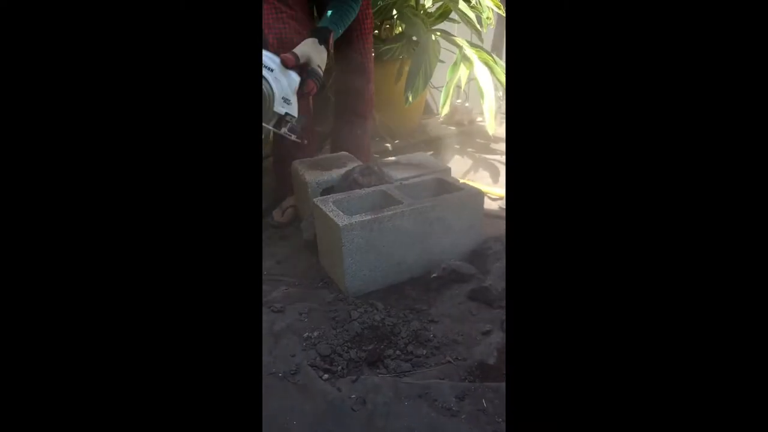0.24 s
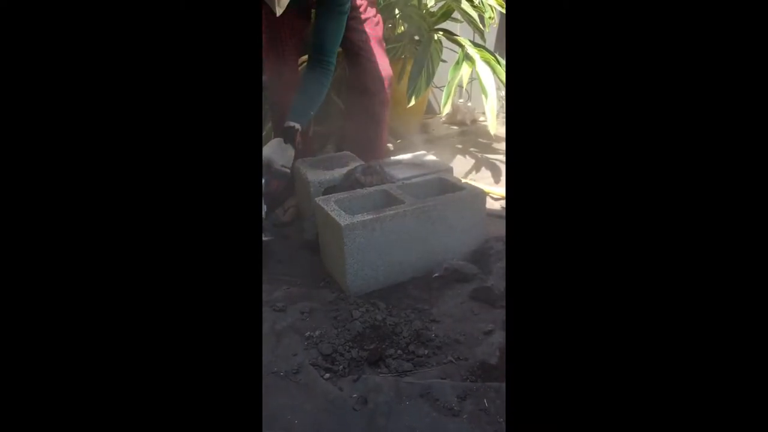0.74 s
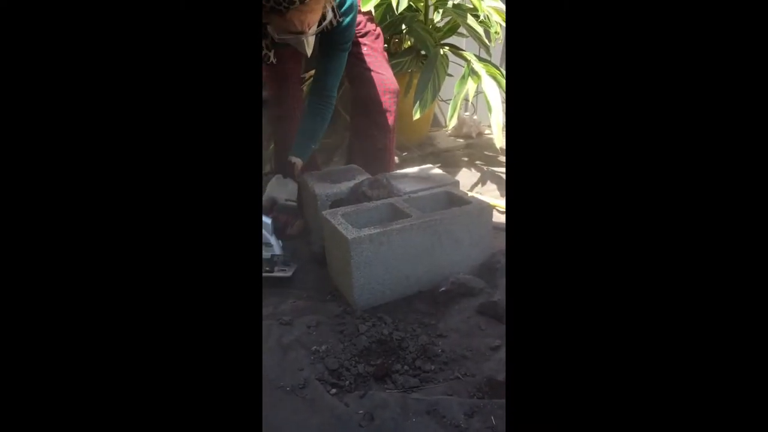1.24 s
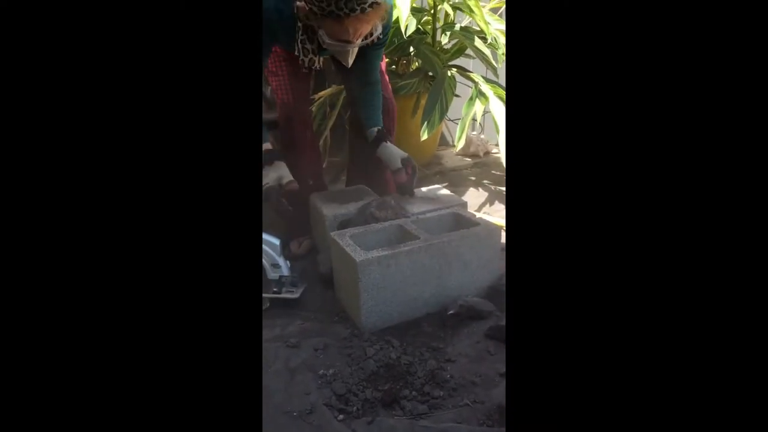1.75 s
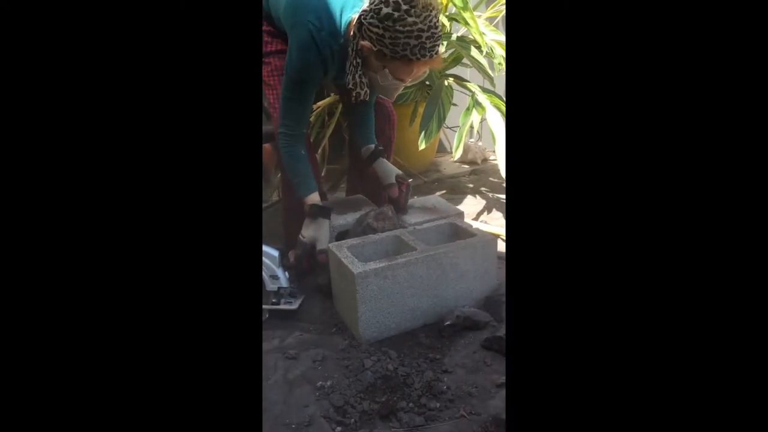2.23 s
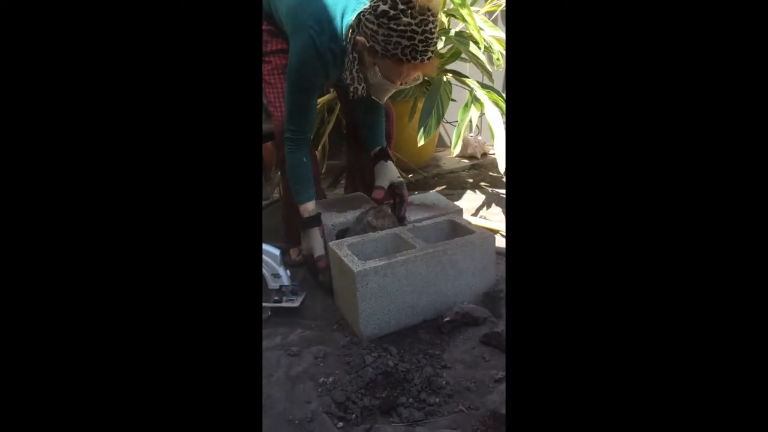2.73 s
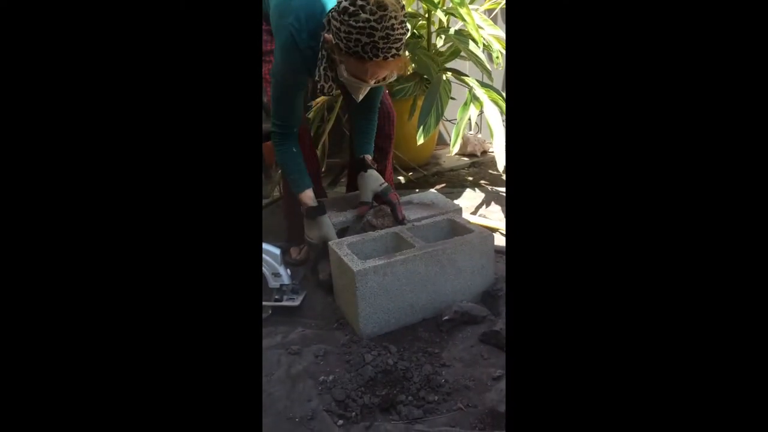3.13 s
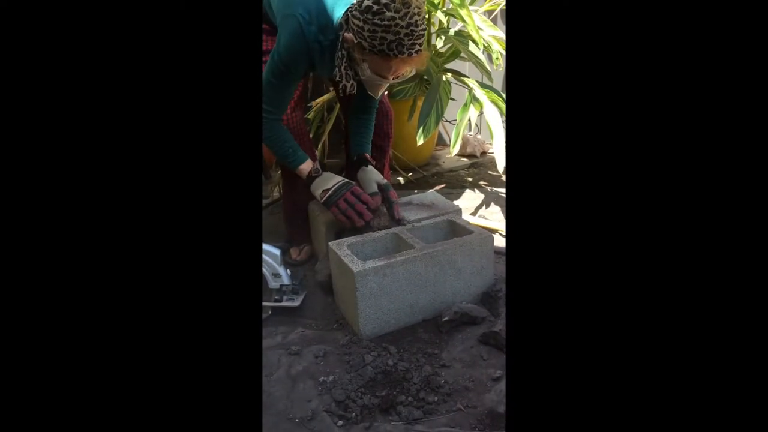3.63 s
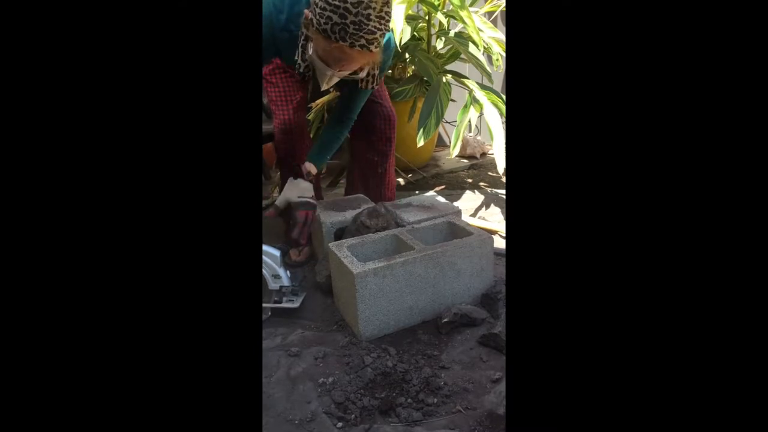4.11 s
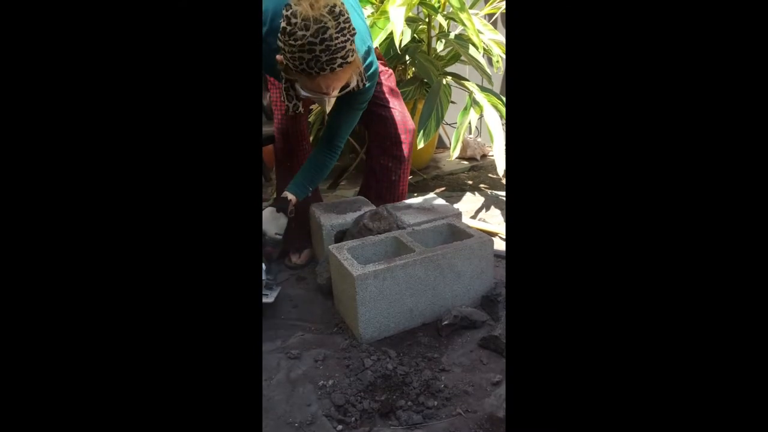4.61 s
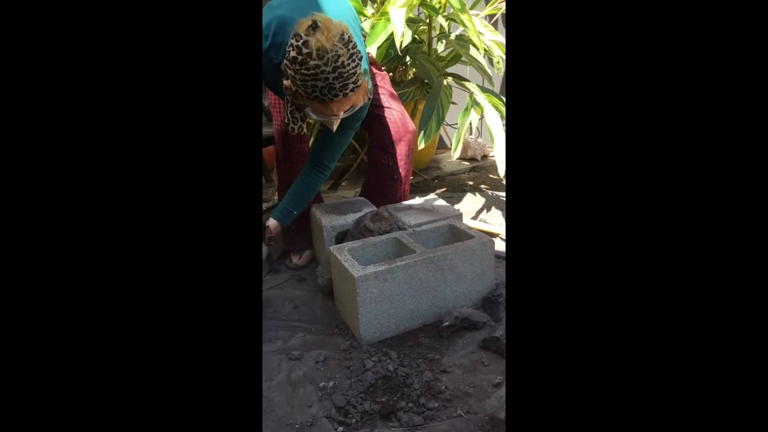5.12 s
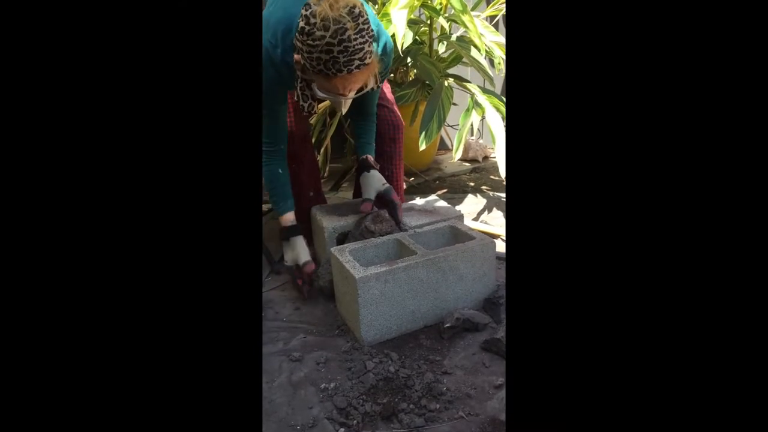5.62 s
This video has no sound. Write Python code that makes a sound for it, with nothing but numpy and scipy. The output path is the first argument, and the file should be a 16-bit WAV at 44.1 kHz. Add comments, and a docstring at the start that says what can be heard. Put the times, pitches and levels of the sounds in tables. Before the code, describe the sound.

Falling motor whine and rushing air of a coasting saw, rhythmic metallic brushing turning to rapid clatter, then silence with gritty stone knocks outdoors.

```python
"""A circular saw, just switched off, is swung aside and set on the ground in a yard, where it coasts to a stop.
Fan and slot tones glide down with one braked speed, over filtered noise for eddies and rushing air.
The blade brushes the guard once a turn, then clatters and drags: tiny random contacts ringing steel modes.
A stone knocks on a concrete block nearby, with ticks, a gritty scrape and rustling cloth.
Contacts get dull yard echoes; a faint noise bed lies behind everything, all at one mono microphone."""
import sys
import numpy as np
from scipy import signal
from scipy.fft import rfft, irfft, next_fast_len
from scipy.io import wavfile

SR = 44100
rng = np.random.default_rng(int(sys.argv[2]) if len(sys.argv) > 2 else 0)


def output_pcm(signal):
    """Save a mono or channel-first signal as 16-bit PCM at the path in sys.argv[1].

    Samples are clipped to [-1, 1] before scaling.
    """
    pcm = np.clip(np.atleast_2d(signal).T, -1, 1) * 32767
    wavfile.write(sys.argv[1], SR, np.round(pcm).astype(np.int16))


N = 258426
TIME = np.arange(N) / SR
# padded length for spectral filters, and its frequency axis
SIZE = 2 * next_fast_len(N // 2 + SR // 4)
HZ = np.maximum(np.arange(SIZE // 2 + 1) * SR / SIZE, 1)

# speed is counted in fan vanes passing per second
START_SPEED, VANES_PER_BLADE_TURN = 3381.8, 61.4
# share of a turn at which the blade meets the guard
RUB_ANGLE = .35
# the blade runs loose from this time on
LOOSE_S = 2.915
# the blade comes to rest, and all its noise dies
REST_S, REST_DB_PER_S = 5.08, 167
# just before rest the contacts turn dull
DULL_S, DULL_DB_PER_S = 4.75, 30
# the motor's tones and eddies die out at low speed
MOTOR_FADE_S, MOTOR_FADE_DB_PER_S = 3.75, 28


def from_db(db):
    """Decibels to gain."""
    return 10 ** (np.asarray(db) / 20)


def rms_one(x):
    """Scale to unit power."""
    return x / np.sqrt(np.mean(x ** 2) + 1e-20)


def in_time(rows):
    """Each column of a curve at every sample."""
    s, *columns = np.transpose(rows)
    return [np.interp(TIME, s, c) for c in columns]


def fading(start_s, db_per_s):
    """Level in dB that holds, then sinks steadily."""
    return -db_per_s * np.maximum(TIME - start_s, 0)


def swell(centre_s, half_s):
    """Bell-shaped rise and fall in time."""
    return np.exp(-.5 * ((TIME - centre_s) / half_s) ** 2)


def turns_from(turns, angle):
    """Signed share of a turn away from an angle, -0.5 to 0.5."""
    return (turns - angle + .5) % 1 - .5


def passed(x, hz, kind, order=2):
    """Butterworth filter."""
    sos = signal.butter(order, np.clip(hz, 5, .45 * SR), kind, fs=SR, output="sos")
    return signal.sosfilt(sos, x + 1e-18)


def drift(rate):
    """Random wander of spread 1, with so many new values per second."""
    return rms_one(np.interp(TIME * rate, np.arange(4096), rng.standard_normal(4096)))


def colour(x, spectrum, resonances=()):
    """Causal filter with a smooth spectrum, lifted at each resonance."""
    hz, db = np.transpose(spectrum)
    curve = np.interp(np.log(HZ), np.log(hz), db)
    for centre, width, lift in resonances:
        curve = curve + lift / (1 + (2 * (HZ - centre) / width) ** 2)
    # folding the cepstrum gives minimum phase: nothing sounds before its cause
    cepstrum = irfft(np.log(from_db(curve)))[:SIZE // 2]
    cepstrum[1:] *= 2
    return irfft(rfft(x, SIZE) * np.exp(rfft(cepstrum, SIZE)))[:N]


def shaped(x, spectrum):
    """Colour a sound so that white noise keeps its power."""
    hz, db = np.transpose(spectrum)
    gain = from_db(np.interp(np.log(HZ), np.log(hz), db))
    return colour(x, spectrum) / np.sqrt(np.mean(gain ** 2))


def ring(x, modes):
    """Parallel resonances of alternating sign, scaled so that white noise about keeps its power."""
    out, power = 0, 0
    for k, (hz, width, db) in enumerate(modes):
        r = np.exp(-np.pi * width / SR)
        top = (1 - r * r) / 2
        poles = [1, -2 * r * np.cos(2 * np.pi * hz / SR), r * r]
        out = out + (-1) ** k * from_db(db) * signal.lfilter([top, 0, -top], poles, x + 1e-18)
        power += top * from_db(db) ** 2
    return out / np.sqrt(power)


def grains(per_s, spread_db):
    """Dense tiny contacts of uneven size; rms 1."""
    sizes = from_db(spread_db * np.minimum(rng.exponential(1, N), 4)) * rng.choice([-1, 1], N)
    return rms_one(sizes * (rng.random(N) < per_s / SR))


def blows(rows, decay_s):
    """Force envelope that jumps at each (time [s], level [dB]) and dies away."""
    hits = np.zeros(N)
    for s, db in rows:
        hits[int(s * SR)] += from_db(db)
    return signal.lfilter([1], [1, -np.exp(-1 / (decay_s * SR))], hits + 1e-18)


def yard_background():
    """The open yard's faint, mostly low noise, wavering slightly in level."""
    # outdoor noise spectrum: (frequency [Hz], relative level per Hz [dB])
    yard_spectrum = [(25, -51), (45, -9), (70, -1.5), (125, 1), (200, -5.5), (350, -17), (700, -17.5),
                     (1200, -15.5), (2000, -32), (5000, -41), (15800, -43.5)]
    noise = rms_one(colour(rng.standard_normal(N), yard_spectrum))
    return from_db(-53 + 0.35 * drift(4.8)) * noise


def yard_echoes(x, t60=0.16, wall_cut_hz=6000):
    """The direct sound plus a few dull echoes and a short scattered tail."""
    # nearby ground and walls: (delay [s], level [dB])
    echo_rows = [(.0175, -26), (.027, -25), (.034, -24)]
    age = np.arange(SR // 2) / SR
    tail = rng.standard_normal(len(age)) * from_db(-60 * age / t60) * (age > .006)
    response = from_db(-11.0) * tail / np.sqrt(np.sum(tail ** 2))
    for delay, db in echo_rows:
        response[int(delay * SR)] += from_db(db)
    return x + passed(signal.fftconvolve(x, response)[:N], wall_cut_hz, "low")


def rustle(low_hz=606, high_hz=1500):
    """Gloves and clothes shift: soft, dull swells of tiny fibre contacts."""
    # cloth movements: (centre time [s], half length [s], level [dB])
    rustle_rows = [(5.22, 0.038, -52), (5.342, 0.026, -67), (5.435, 0.022, -62), (5.506, 0.0096, -61),
                   (5.573, 0.014, -55.5)]
    swells = sum(from_db(db) * swell(s, half) for s, half, db in rustle_rows)
    cloth = passed(grains(per_s=1500, spread_db=3.0), [low_hz, high_hz], "band")
    return swells * rms_one(cloth)


def scrapes(attack_db_per_s=2498, release_db_per_s=598):
    """Sand grains crushed as the stone slides; each scrape starts fast, holds and dies away."""
    # stone slid over the block: (start time [s], length [s], level [dB], treble lift [dB])
    scrape_rows = [(4.345, .008, -47, 3), (4.477, .008, -45, -5), (4.54, .03, -60, 0),
                   (4.615, .02, -54.5, 0), (4.7, .03, -57, 0), (4.79, .02, -54, -3),
                   (4.853, 0.058, -55.5, 1.5), (4.93, .04, -67, 0), (5.114, .005, -44, 3),
                   (5.13, 0.066, -62, 2), (5.203, 0.0078, -48, 0), (5.415, .012, -66, 3),
                   (5.447, .006, -71, 3), (5.547, 0.032, -76, 0), (5.681, .003, -48.5, 1),
                   (5.723, .02, -48.5, 4), (5.741, 0.0076, -45, 7.5), (5.776, 0.016, -43, -3),
                   (5.803, .08, -51, -9)]
    # crushed grit: (frequency [Hz], relative level per Hz [dB])
    grit_spectrum = [(180, -44), (300, -10), (360, -10.5), (1550, -7), (1920, -6.5), (2120, -3.5),
                     (3270, -3.5), (4790, -4), (8700, -9.5), (15800, -16.5)]
    levels_db = []
    for s, length, db, _ in scrape_rows:
        attack_db = -attack_db_per_s * np.maximum(s - TIME, 0)
        levels_db.append(db + attack_db + fading(s + length, release_db_per_s))
    levels_db = np.array(levels_db)
    bright_db = levels_db + np.array(scrape_rows)[:, 3:]
    sand = shaped(grains(per_s=9200, spread_db=6.0), grit_spectrum)
    treble = passed(sand, 6500, "high", order=1)
    # the loudest scrape of the moment sets the level
    body = from_db(levels_db.max(axis=0)) * (sand - treble)
    return body + from_db(bright_db.max(axis=0)) * treble


def grit_ticks():
    """Grit snaps under the stone: brief bright bursts of random force."""
    # grit snapping: (time [s], relative level [dB])
    tick_rows = [(5.505, -50), (5.5495, -25.5), (5.572, -30), (5.7745, -42), (5.7895, -31), (5.801, -37),
                 (5.846, -53)]
    snaps = from_db(-5.5) * blows(tick_rows, decay_s=0.0012) * rng.choice([-1, 1], N)
    return passed(snaps, 7700, "high", order=1)


def stone_and_bumps(contact_s=0.0043, thump_hz=122, thump_width_hz=40):
    """Each knock is a short crunch that rings the stone and thumps the ground; soft bumps only thump."""
    # stone on block: (time [s], relative level [dB], contact cut-off [Hz], relative low thump level [dB])
    knock_rows = [(5.11, -6, 1560, -35), (5.1137, -7.5, 7100, -38), (5.117, -13, 4000, -44),
                  (5.205, -34, 7000, -41), (5.418, -41.5, 4930, -62), (5.426, -45, 5000, -61),
                  (5.68, -29.5, 9000, -55), (5.681, -60, 7000, -56), (5.848, -45, 8900, -59)]
    # stone modes: (frequency [Hz], width [Hz], relative level [dB])
    stone_modes = [(430, 220, -21), (675, 91, -13), (1010, 120, -11.5), (1210, 47, -7), (1484, 67, -1),
                   (1760, 250, -6.5), (2030, 200, -4), (2500, 240, -7), (2980, 210, -12.5),
                   (3590, 180, -8.5), (4470, 230, -15), (5600, 410, -36), (6700, 200, -19),
                   (8660, 220, -11)]
    # soft bumps on the ground: (time [s], relative level [dB])
    bump_rows = [(1.209, -32), (1.262, -35), (4.354, -37.5), (5.207, -33.5), (5.319, -45), (5.37, -47.5)]
    force, thump = np.zeros(N), np.zeros(N)
    age = np.arange(SR // 40) / SR
    crunches = rng.choice([-1, 1], (len(knock_rows), len(age))) * np.exp(-age / contact_s)
    for (s, db, cut_hz, thump_db), crunch in zip(knock_rows, crunches):
        at = int(s * SR)
        blow = 0.5 * crunch + 3.9 * (age == 0)
        force[at:at + len(age)] += from_db(db) * passed(blow, cut_hz, "low", order=4)[:N - at]
        thump[at] = from_db(thump_db)
    for s, db in bump_rows:
        thump[int(s * SR)] = from_db(db)
    low = ring(thump, [(thump_hz, thump_width_hz, 0), (270, 110, -9)])
    crunching = from_db(-8.0) * passed(force, 770, "high", order=1)
    return from_db(-1.0) * ring(force, stone_modes) + crunching + from_db(23.0) * low


def coasting():
    """Speed at every sample, braked step by step by dry friction, grease and air drag."""
    # speed lost per second: constant, per speed, per speed squared
    dry_friction, grease_drag, air_drag = 360.8, .1018, 3.834e-5
    step_s = .001
    speeds = [START_SPEED]
    steps = np.arange(0, N / SR, step_s)
    for _ in steps[1:]:
        v = speeds[-1]
        braking = dry_friction + grease_drag * v + air_drag * v * v
        speeds.append(max(v - step_s * braking, 1))
    return np.interp(TIME, steps, speeds)


def air(speed_db, turns):
    """Housing turbulence sinks with speed, gently chopped by the turning blade and mirrored in the ground."""
    # rushing air: (frequency [Hz], relative level per Hz [dB])
    air_spectrum = [(88, -36), (150, -15.5), (532, -25), (634, -9), (901, -1.5), (1440, 2.5), (1650, -1.5),
                    (1850, -3), (2080, -5.5), (2480, -2), (3460, -13), (4370, -16), (4810, -14),
                    (8640, -20), (15800, -27.5)]
    # housing resonances: (frequency [Hz], width [Hz], lift [dB])
    housing_modes = [(461, 260, 15), (677, 100, 8), (818, 140, 7), (1104, 280, 5.5), (1400, 41, 6),
                     (1845, 290, 14.5), (2140, 120, 9), (2500, 450, 8.5), (3120, 52, 6.5), (4260, 106, 9.5),
                     (5730, 560, 2.5), (9470, 462, 1)]
    # cooling air: (low edge [Hz], high edge [Hz], base level at full speed [dB], loss per dB of speed lost [dB])
    band_rows = [(173, 590, -37, 1.38), (526, 1190, -32.5, 1.05), (1072, 2750, -27, 1.69),
                 (2996, 21800, -25, 2)]
    # the vents turn as the saw is swung aside, level changes:
    # (time [s], housing drone [dB], duct roar [dB], vent rush [dB], hiss [dB])
    swing_rows = [(0, -1, -1, -1, -1.5), (0.249, 1, 0, -5, -1), (.45, 2, 0.5, 0.5, 1.5),
                  (.65, 2.5, -3, 6.5, 2.5), (.8, 4, -13, 4, 2), (1.02, 5.5, -3, 5.5, 1),
                  (1.3, 6.5, -2, 2.5, 0), (2.0, 4.5, 0.5, 0, -1.5), (3.0, 1, 3.5, 0.5, -6.5)]
    out = 0
    for (low, high, db, follows), swing_db in zip(band_rows, in_time(swing_rows)):
        noise = colour(rng.standard_normal(N), air_spectrum, housing_modes)
        band = rms_one(passed(noise, [low, high], "band", order=4))
        out = out + band * from_db(db + follows * speed_db + swing_db + 0.86 * drift(40))
    # the ground reflection's delay [s] shortens as the saw is lowered
    delay = np.interp(TIME, [0, 0.94], [0.001418, 0.000542])
    out = out + 0.27 * np.interp(TIME - delay, TIME, out)
    chop_db = 0.13 * np.cos(2 * np.pi * (turns - RUB_ANGLE))
    return out * from_db(chop_db + fading(REST_S, REST_DB_PER_S))


def eddies(speed_db, vanes):
    """Shed by the fan: a narrow rush falling with its tone; the small housing radiates little of its bass."""
    pitch_ratio, width_hz = .68, 122  # pitch as share of the fan's
    swirl = rms_one(passed(rng.standard_normal(N), width_hz, "low"))
    rush = np.sqrt(2) * swirl * np.sin(2 * np.pi * pitch_ratio * vanes)
    rush = rush * from_db(-35 + 0.99 * speed_db + fading(MOTOR_FADE_S, MOTOR_FADE_DB_PER_S))
    return passed(rush, 580, "high", order=6)


def squeaks(width_hz=89):
    """Short unsteady tones of the rim as it sticks and slips."""
    # the rim catches: (centre time [s], half length [s], pitch [Hz], level [dB])
    squeak_rows = [(0.027, .012, 4260, -39), (0.142, 0.0076, 4320, -27), (0.433, 0.0089, 4330, -33),
                   (1.277, 0.0065, 13600, -46), (1.42, .005, 13600, -47), (1.489, .006, 13600, -41),
                   (1.674, .008, 13600, -45), (1.744, .009, 13600, -42), (2.898, 0.011, 9400, -49),
                   (2.943, 0.0092, 9400, -46), (2.987, 0.011, 9100, -44), (3.05, 0.0096, 9420, -44),
                   (4.586, .035, 4420, -51), (4.662, 0.0079, 2950, -42), (4.698, 0.0082, 2860, -42),
                   (4.732, .008, 2980, -44)]
    flutter = passed(rng.standard_normal((2, N)), width_hz, "low")
    flutter = rms_one(flutter[0]) + 1j * rms_one(flutter[1])
    out = 0
    for s, half, hz, db in squeak_rows:
        tone = (flutter * np.exp(2j * np.pi * hz * TIME)).real
        out = out + from_db(db) * swell(s, half) * tone
    return out


def drag():
    """The stopping blade drags in swells of rough stick and slip; dull resonances shift with the spot touched."""
    # each swell: (centre time [s], half length [s], relative level [dB], pitch of the first resonance [Hz])
    drag_rows = [(4.542, 0.017, -32, 1270), (4.596, 0.021, -37, 1280), (4.673, 0.016, -40.5, 1245),
                 (4.713, 0.02, -36.5, 1270), (4.762, 0.02, -37, 1270), (4.814, 0.035, -38.5, 1254),
                 (4.885, 0.039, -41, 1370), (4.96, 0.032, -44, 1277), (5.014, 0.025, -47, 1210),
                 (5.085, 0.029, -41.5, 1270)]
    # resonances of the dragging blade: (frequency [Hz], width [Hz], relative level [dB])
    drag_modes = [(1290, 107, 6), (1480, 67, 9), (1685, 310, -2), (2610, 110, 1), (2680, 580, -13),
                  (3540, 160, -6), (4370, 4100, -17.5)]
    slips = from_db(1.7 * drift(110) + fading(REST_S, REST_DB_PER_S)) * grains(per_s=2200, spread_db=2.0)
    out = 0
    for s, half, db, pitch in drag_rows:
        modes = [(hz * pitch / drag_modes[0][0], width, level) for hz, width, level in drag_modes]
        out = out + ring(from_db(db) * swell(s, half) * slips, modes)
    # the bright rasp fades before the rest
    rasp = from_db(-6.5 + fading(4.7, 45)) * passed(out, 4900, "high", order=6)
    return rasp + passed(out, 4600, "low", order=14)


def rim(turns):
    """The loose blade's rim sings in a wavering burst once a turn, with a weaker noisy mode just above."""
    start_s, rim_hz = 3.19, 4320
    angle, width_turns = .47, .17
    bursts = np.exp(-.5 * (turns_from(turns, angle) / width_turns) ** 4) * (TIME > start_s)
    tone = np.sin(2 * np.pi * rim_hz * TIME + 1.1 * drift(70)) * from_db(2 * drift(25))
    tone = tone + from_db(-8.5) * ring(rng.standard_normal(N), [(4495, 130, 0)])
    level_db = -38 + fading(start_s, 8) + fading(DULL_S, DULL_DB_PER_S) + fading(REST_S, REST_DB_PER_S)
    return tone * bursts * from_db(level_db)


def clacks():
    """The wobbling blade hits the guard: scraping pressure of all clacks, and the plate's clean rings."""
    # each clack: (time [s], contact length [s], relative crunch level [dB], relative ring level [dB],
    # ring pitch [Hz])
    clack_rows = [(0.977, 0.009, -24, -13.5, 1434), (1.144, 0.009, -33, -9.5, 1425),
                  (1.173, 0.009, -36, -17, 1450), (1.202, 0.009, -27, -16, 1460),
                  (1.234, 0.0099, -19, -23, 1450), (1.252, 0.011, -22, -6, 1450),
                  (1.362, 0.009, -33, -15.5, 1425), (1.401, 0.009, -36, -18, 1394),
                  (1.42, 0.009, -30, -14, 1450), (1.645, 0.009, -29, -23, 1390),
                  (2.17, 0.009, -32, -15.5, 1450), (2.248, 0.009, -19, -21, 1415),
                  (2.418, 0.009, -21, -27, 1450), (2.547, 0.009, -30, -28, 1420),
                  (2.689, 0.009, -34, -20.5, 1580), (2.736, 0.009, -30, -18, 1500),
                  (2.785, 0.009, -37, -23, 1485), (2.929, 0.0089, -16.0, -20.5, 1507),
                  (2.974, 0.013, -17.5, -14, 1525), (2.999, 0.0093, -18.0, -18, 1444),
                  (3.035, 0.011, -17, -19, 1450), (3.057, 0.014, -20, -19, 1440),
                  (3.085, 0.017, -20.0, -27, 1490), (3.113, 0.0057, -18, -15.5, 1456),
                  (3.143, 0.024, -20.5, -36.5, 1450), (3.169, 0.012, -22, -19, 1450),
                  (3.2, 0.018, -19, -39, 1580), (3.221, 0.017, -18.0, -35, 1440),
                  (3.245, 0.024, -24.0, -39, 1440), (3.264, 0.018, -18.5, -29, 1400),
                  (3.293, 0.018, -21.5, -30, 1450), (3.32, 0.019, -17, -34, 1550),
                  (3.336, 0.021, -20, -38, 1410), (3.357, 0.021, -21, -27, 1580),
                  (3.389, 0.022, -19.5, -20, 1570), (3.413, 0.009, -20, -21, 1467),
                  (3.428, 0.01, -19, -28, 1420), (3.459, 0.0096, -18, -36, 1530),
                  (3.47, 0.026, -21, -25, 1500), (3.502, 0.011, -20.5, -21, 1450),
                  (3.532, 0.015, -19, -21, 1443), (3.547, 0.016, -19.5, -37, 1480),
                  (3.57, 0.018, -21.5, -32, 1540), (3.601, 0.019, -20.5, -37, 1410),
                  (3.621, 0.021, -19, -26, 1510), (3.64, 0.02, -27.5, -18.5, 1570),
                  (3.666, 0.003, -15, -36, 1580), (3.685, 0.006, -18, -37, 1540),
                  (3.694, 0.016, -19.5, -36, 1500), (3.717, 0.0065, -15.5, -31, 1500),
                  (3.732, 0.01, -22, -28, 1530), (3.746, 0.0069, -21, -21, 1460),
                  (3.766, 0.019, -19, -24, 1450), (3.786, 0.023, -23.5, -22, 1450),
                  (3.811, 0.011, -21.5, -23, 1440), (3.83, 0.0034, -19, -28, 1390),
                  (3.851, 0.0052, -16.5, -31, 1600), (3.865, 0.018, -20.5, -37, 1440),
                  (3.887, 0.018, -21, -34, 1550), (3.907, 0.023, -23, -45, 1570),
                  (3.936, 0.011, -21, -39, 1430), (3.953, 0.01, -18.5, -28, 1550),
                  (3.97, 0.011, -21, -30, 1480), (3.985, 0.013, -20.5, -33, 1450),
                  (4.01, 0.013, -23.5, -23, 1440), (4.037, 0.01, -22.5, -34, 1620),
                  (4.054, 0.008, -19.5, -23, 1567), (4.071, 0.009, -32.5, -41, 1510),
                  (4.089, 0.01, -23, -29, 1530), (4.114, 0.012, -25.5, -28, 1470),
                  (4.134, 0.015, -20, -27, 1440), (4.158, 0.016, -22, -29, 1430),
                  (4.18, 0.019, -23.5, -31, 1430), (4.198, 0.019, -25.5, -28, 1450),
                  (4.221, 0.013, -22, -33, 1570), (4.244, 0.014, -19.5, -30, 1420),
                  (4.274, 0.0071, -17.5, -38, 1630), (4.293, 0.014, -23.5, -33, 1450),
                  (4.313, 0.017, -25, -33, 1460), (4.348, 0.0083, -20.5, -24, 1450),
                  (4.375, 0.0097, -24, -21, 1450), (4.404, 0.0096, -22.5, -21.5, 1464),
                  (4.427, 0.012, -28, -45, 1520), (4.446, 0.02, -29.5, -42, 1420),
                  (4.473, 0.017, -26, -43, 1410), (4.491, 0.022, -27.0, -31, 1474)]
    attack_s, sag_s, release_s = .001, .03, .0036
    ring_rise_s, ring_decay_s = 0.004, 0.0086
    pressure, rings = np.zeros(N), np.zeros(N)
    age = np.arange(SR // 10) / SR
    ringing = (1 - np.exp(-age / ring_rise_s)) * np.exp(-age / ring_decay_s)
    for (s, hold_s, crunch_db, ring_db, hz), turn in zip(clack_rows, rng.random(len(clack_rows))):
        span = slice(int(s * SR), int(s * SR) + len(age))
        # bite, scrape for a moment, let go
        contact = (1 - np.exp(-age / attack_s)) * np.exp(-np.maximum(age - hold_s, 0) / release_s)
        contact = contact * np.exp((hold_s / 2 - age) / sag_s)
        pressure[span] = np.hypot(pressure[span], from_db(crunch_db) * contact)
        rings[span] += from_db(ring_db) * ringing * np.sin(2 * np.pi * (hz * age + turn))
    return pressure, from_db(-1.0) * rings


def guard_brush(turns, brush_turns=0.08):
    """Once-a-turn brush on the guard: builds as the saw is lowered, ends when the blade runs loose."""
    full_s, rise_db_per_s = 0.43, 12.5
    brush_db = -26.5 - rise_db_per_s * np.maximum(full_s - TIME, 0)
    touch = np.exp(-.5 * (turns_from(turns, RUB_ANGLE) / brush_turns) ** 2)
    return from_db(brush_db + 0.44 * drift(24.1)) * touch * (TIME < LOOSE_S)


def steady_chatter():
    """Unsteady light contact: one level while the blade runs true, another once it is loose."""
    chatter_db = np.where(TIME < LOOSE_S, -45, -46) + fading(4.29, 9) + fading(REST_S, REST_DB_PER_S)
    return from_db(chatter_db + 3 * drift(90))


def plate_singing(brush):
    """Every brush sets the plate's main mode singing, louder while the saw is being set down."""
    shake_db = 6.5 * swell(1.2, .25)
    tone = np.sin(2 * np.pi * 1450 * TIME + 2 * drift(60))
    return from_db(-3 + shake_db) * brush * tone


def glitter(force):
    """Treble of the contacts; each touches another spot, so every band comes and goes by itself."""
    edges_hz, patchy_db, changes_per_s = [5700, 7200, 8900, 10300, 12400, 17000], 2.6, 55
    out = 0
    for band in zip(edges_hz, edges_hz[1:]):
        patches = rms_one(from_db(patchy_db * drift(changes_per_s)))
        out = out + passed(force, band, "band", order=4) * patches
    return out


def blade(speed_db, turns):
    """The wobbling blade brushes once a turn, then clacks loosely; every contact rings the steel."""
    # blade and guard modes: (frequency [Hz], width [Hz], relative level [dB])
    blade_modes = [(993, 47, -19), (1240, 50, -2.5), (1439, 37, 0.5), (1530, 62, -0.5), (1690, 160, -8),
                   (2245, 105, -3.5), (2467, 167, -7), (2985, 82, -5.5), (3300, 510, -17.5),
                   (3590, 32, -10), (3780, 98, -13), (4305, 54, -10.5), (4440, 62, -11.5),
                   (5430, 170, -11.5), (5760, 61, -20.5), (6540, 570, -19.5), (7680, 170, -19),
                   (8320, 61, -15), (8690, 100, -17.5), (9390, 88, -18.5), (11070, 140, -23),
                   (11930, 80, -27.5), (13100, 330, -28), (14160, 100, -37)]
    # bare contact noise: (frequency [Hz], relative level per Hz [dB])
    contact_spectrum = [(200, -22), (450, -14), (700, -3), (1500, 0), (2600, -1), (4400, -9), (5000, -13),
                        (8500, -13), (10200, -25), (13000, -22), (15800, -26)]
    # sharp jolts: two once-a-turn clacks of the blade, then the saw set down on the ground: (time [s], relative
    # level [dB])
    jolt_rows = [(1.146, -17), (1.173, -19), (1.2545, -12)]
    brush = guard_brush(turns)
    pressure, rings = clacks()
    clatter = from_db(-12.5) * pressure
    contact = np.sqrt(brush ** 2 + steady_chatter() ** 2 + clatter ** 2)
    force = contact * grains(per_s=8000, spread_db=3.0)
    jolts = blows(jolt_rows, decay_s=0.0057) * rng.choice([-1, 1], N)
    force = force + passed(jolts, 3500, "low", order=1)
    # contacts soften as the blade slows: treble loses 0.86 dB per dB of speed lost
    treble_db = 8 + 0.86 * speed_db + fading(DULL_S, DULL_DB_PER_S)
    force = passed(force, 4700, "low", order=10) + from_db(treble_db) * glitter(force)
    steel = from_db(-0.5) * ring(force, blade_modes)
    bare = from_db(-12.5) * shaped(force, contact_spectrum)
    return rings + plate_singing(brush) + steel + rim(turns) + bare


def duct_lifts(fan_hz, slot_hz):
    """Lifts in dB of the fan tone and the slot tone as they fall through the fan duct's resonances."""
    # duct resonances: (frequency [Hz], width [Hz], lift of fan tone [dB], lift of slot tone [dB])
    duct_modes = [(760, 230, 5.5, 7.5), (998, 28, 11.5, -3.5), (1100, 160, 8, 1.5), (1270, 110, 1, 8),
                  (1450, 54, -2.5, 11.5), (1610, 100, -1.5, 3), (900, 80, 2, -0.5), (1757, 65, 3, 6.5),
                  (1848, 163, 16, 9), (2010, 150, 6, 12.5), (2180, 64, -4, 5.5), (2270, 91, 13, -2.5),
                  (2455, 88, 12.5, 9), (2596, 136, 14, 16.5)]
    fan_db = slot_db = 0
    for centre, width, fan_lift, slot_lift in duct_modes:
        fan_db = fan_db + fan_lift / (1 + (2 * (fan_hz - centre) / width) ** 2)
        slot_db = slot_db + slot_lift / (1 + (2 * (slot_hz - centre) / width) ** 2)
    return fan_db, slot_db


def motor(speed, speed_db, vanes):
    """Nine fan vanes and twelve armature slots each sing a tone into the duct; air flow makes them waver."""
    slots_per_vane = 4 / 3
    fan_lift, slot_lift = duct_lifts(speed, speed * slots_per_vane)
    # the fan tone weakens faster than the slot tone as speed drops
    fan_db = -31 + 2.17 * speed_db + fan_lift + 1.1 * drift(30)
    slot_db = -50 + 0.32 * speed_db + slot_lift + 1.2 * drift(35)
    phase = 2 * np.pi * vanes + 0.069 * drift(34)
    fan = from_db(fan_db) * (np.sin(phase) + from_db(-32) * np.sin(2 * phase))
    slots = from_db(slot_db) * np.sin(phase * slots_per_vane)
    return np.sqrt(2) * (fan + slots) * from_db(fading(MOTOR_FADE_S, MOTOR_FADE_DB_PER_S))


def scene():
    """One speed drives the motor, air and turning blade; the stone is handled as the saw stops."""
    speed = coasting()
    speed_db = 20 * np.log10(speed / START_SPEED)
    vanes = np.cumsum(speed) / SR
    turns = vanes / VANES_PER_BLADE_TURN
    handling = rustle() + scrapes() + grit_ticks() + stone_and_bumps()
    contacts = handling + squeaks() + drag() + blade(speed_db, turns)
    running = air(speed_db, turns) + eddies(speed_db, vanes) + motor(speed, speed_db, vanes)
    return (yard_background() + yard_echoes(contacts) + running)[None]


def record(dry):
    """A steep low-pass cuts the top of the microphone signal."""
    cutoff_hz = 15900
    return signal.sosfilt(signal.ellip(12, .1, 80, cutoff_hz, fs=SR, output="sos"), dry)


dry = scene()
out = record(dry)
output_pcm(out)
```